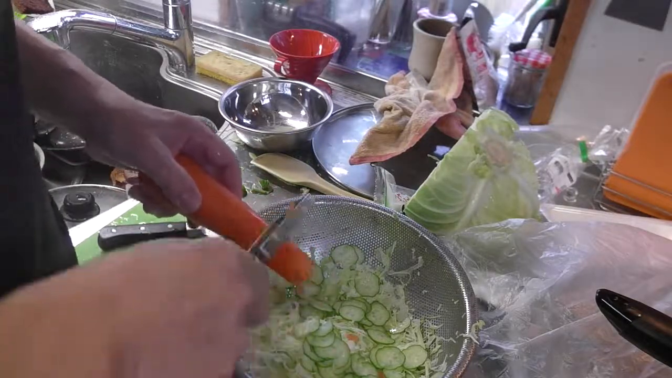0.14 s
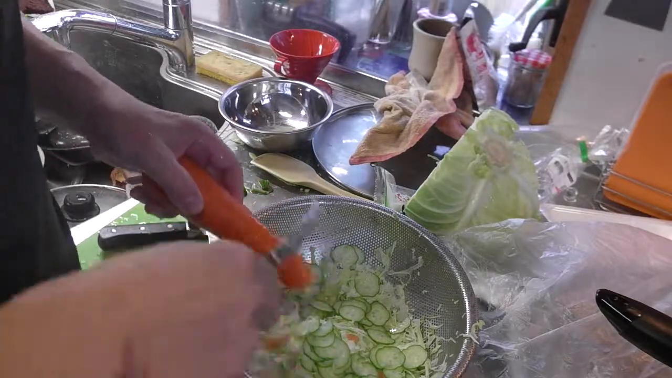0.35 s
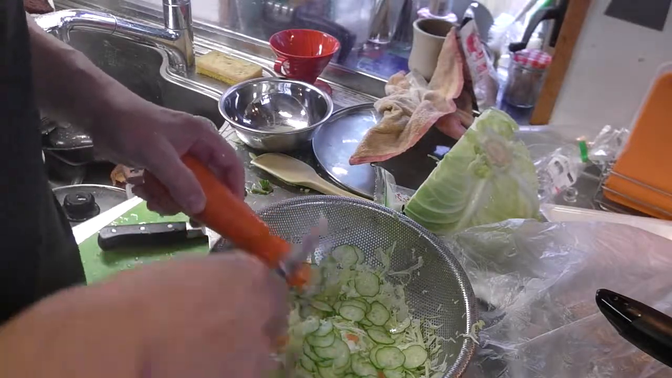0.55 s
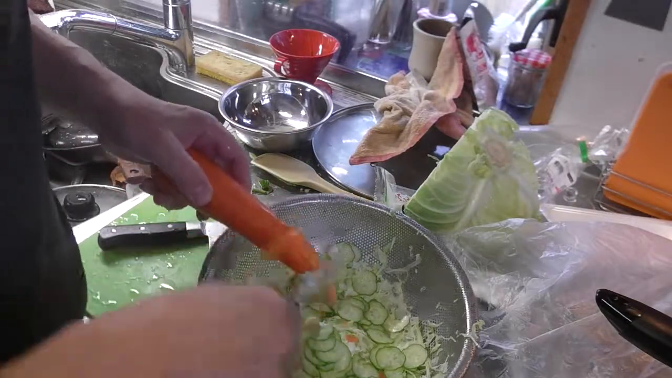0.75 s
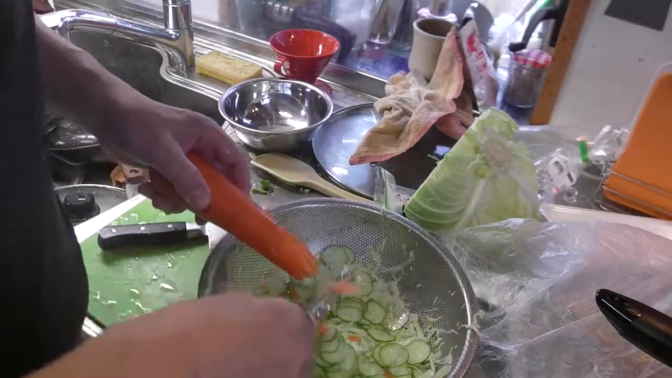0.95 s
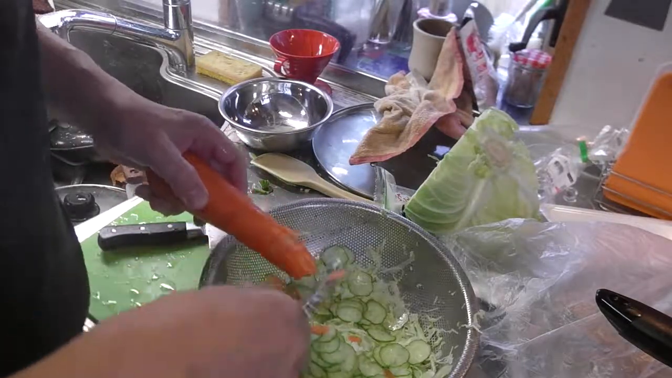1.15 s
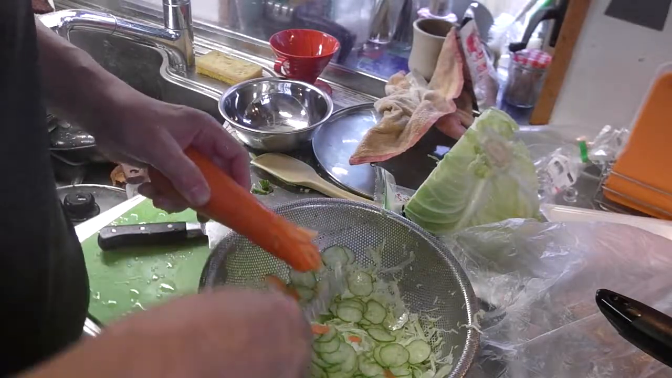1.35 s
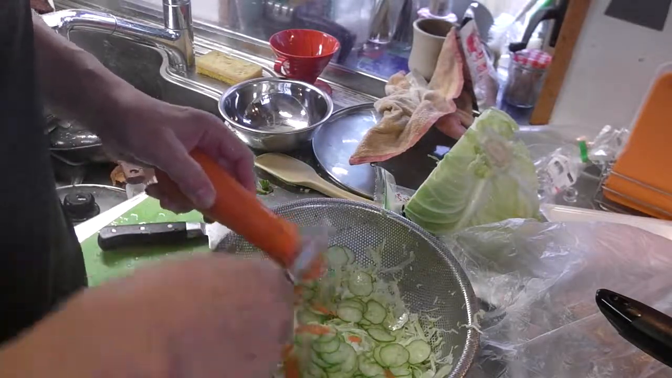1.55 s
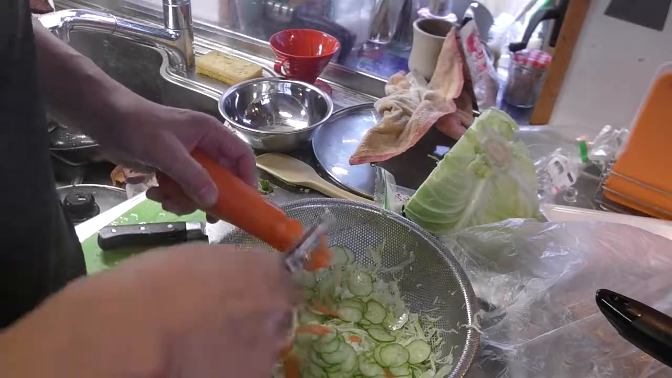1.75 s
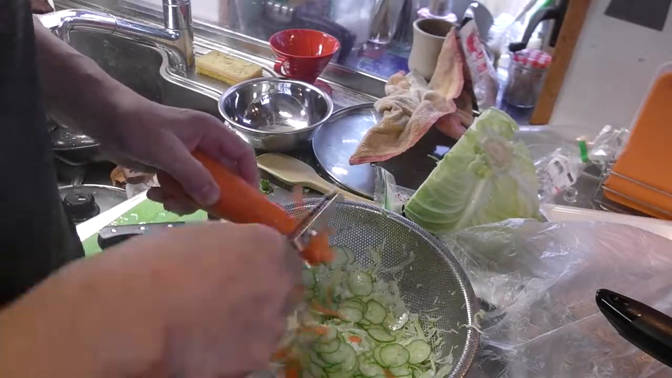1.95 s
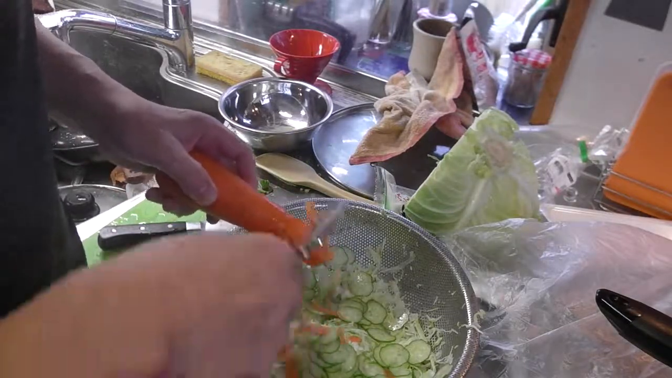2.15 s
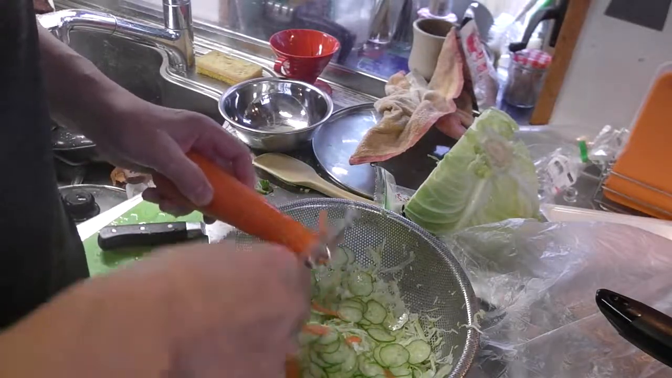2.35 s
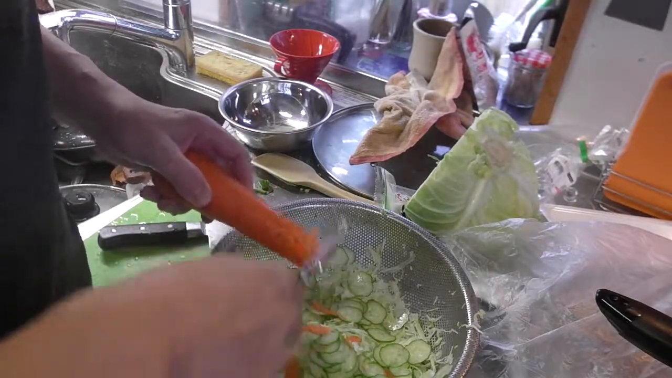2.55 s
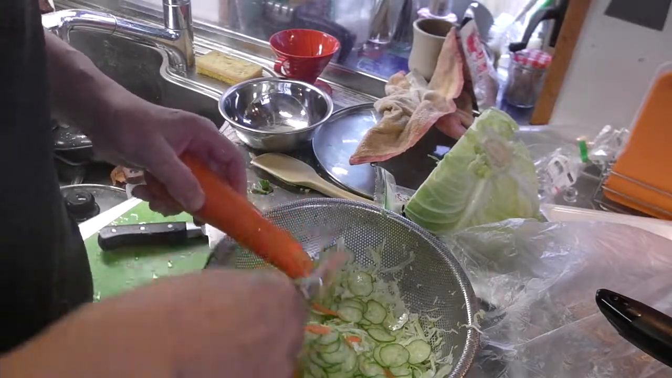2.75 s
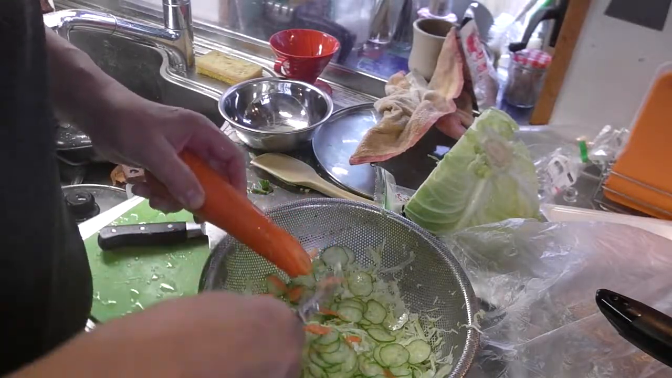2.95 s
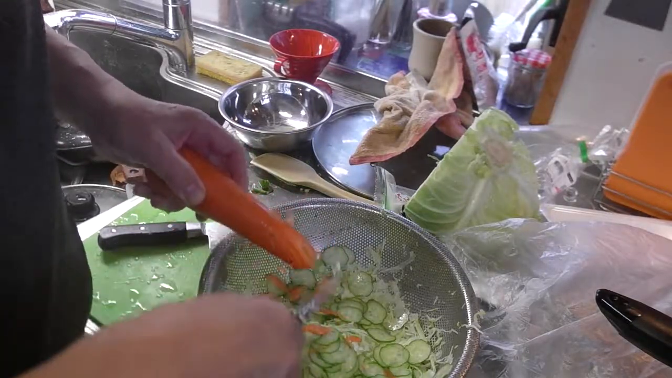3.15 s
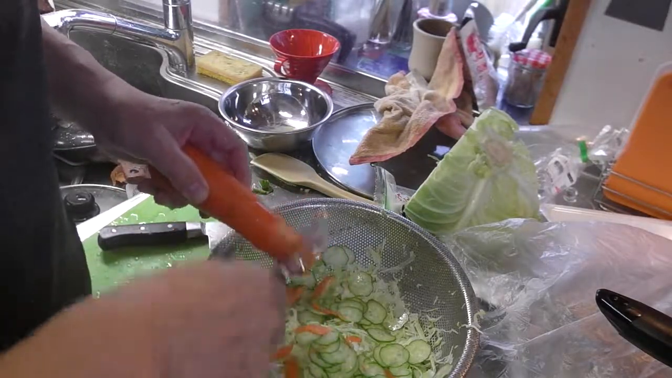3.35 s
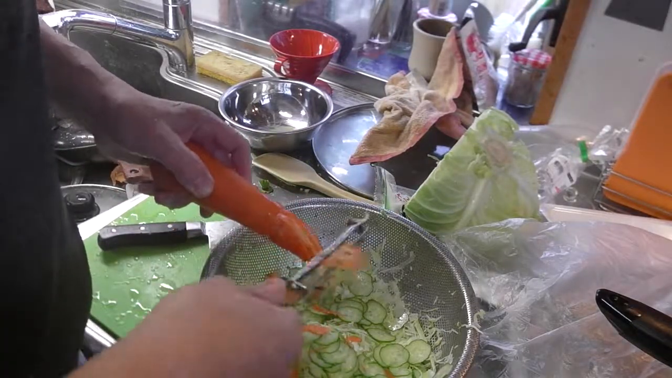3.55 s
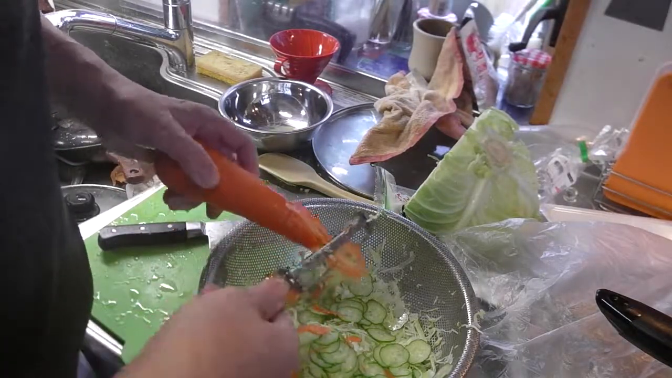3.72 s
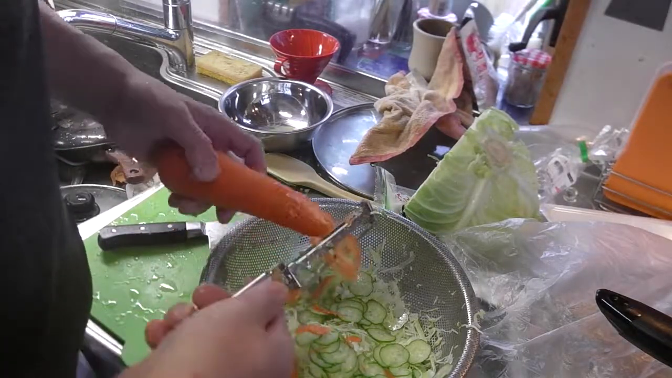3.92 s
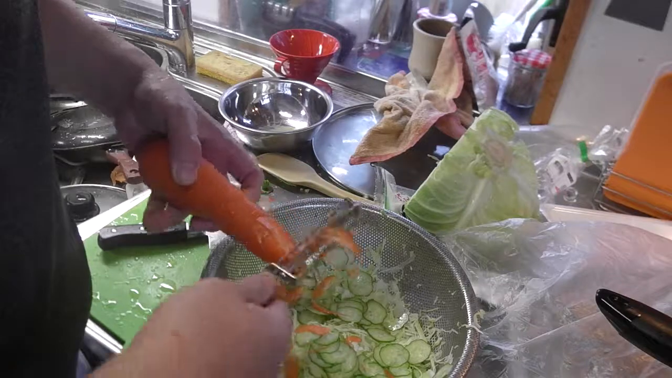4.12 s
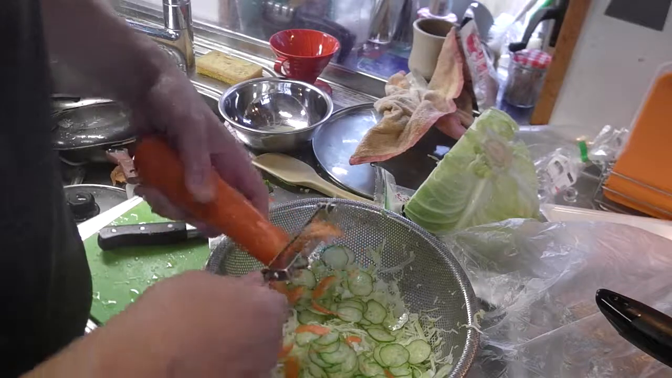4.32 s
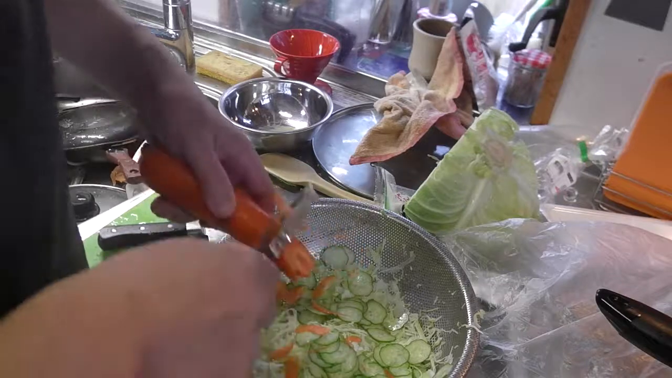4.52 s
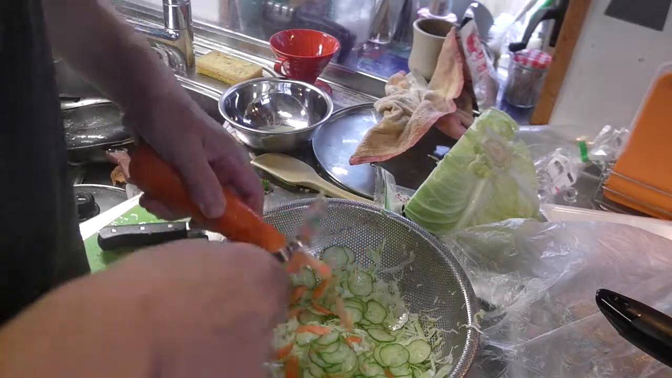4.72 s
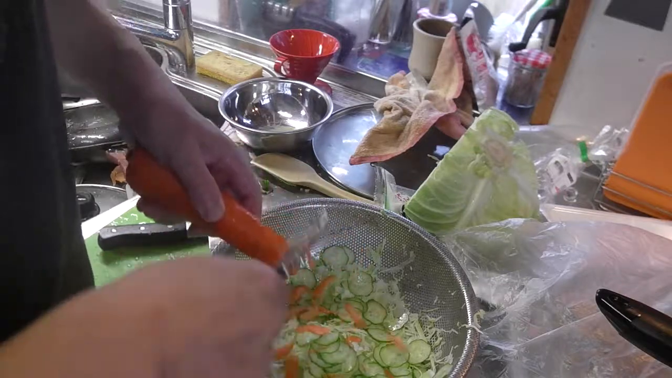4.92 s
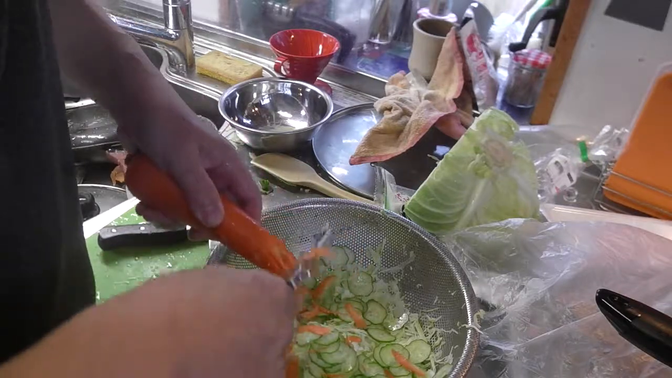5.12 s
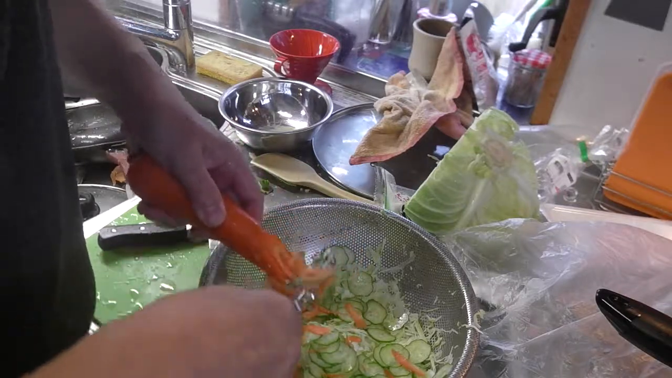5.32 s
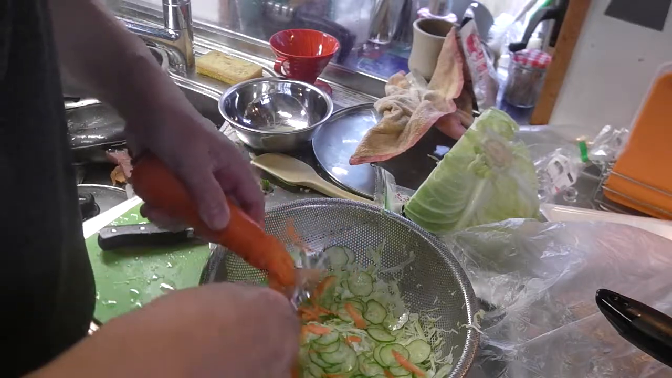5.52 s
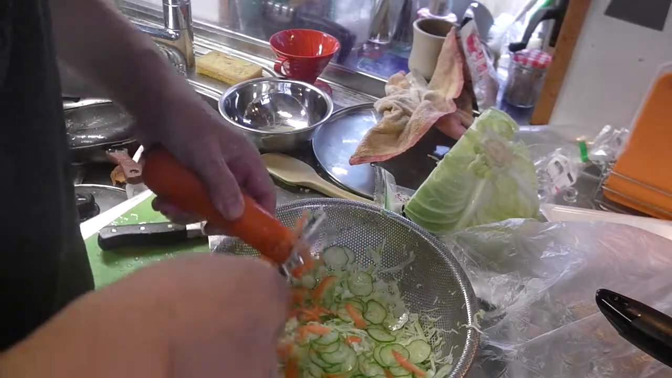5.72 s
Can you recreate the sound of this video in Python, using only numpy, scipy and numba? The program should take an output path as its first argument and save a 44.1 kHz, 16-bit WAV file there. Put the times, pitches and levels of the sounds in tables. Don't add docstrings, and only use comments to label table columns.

```python
import sys
import numpy as np
from scipy import signal
from scipy.fft import rfft, irfft, next_fast_len
from scipy.io import wavfile
from scipy.ndimage import uniform_filter1d, minimum_filter1d
from numba import njit

SR = 44100
rng = np.random.default_rng(int(sys.argv[2]) if len(sys.argv) > 2 else 0)


def wav_out(sig):
    wavfile.write(sys.argv[1], SR, np.round(np.clip(np.atleast_2d(sig).T, -1, 1) * 32767).astype(np.int16))


def linear_from_db(decibels):
    return 10 ** (np.asarray(decibels, float) / 20)


N = 258867
KNEE_DB, RATIO = -8.5, 1.447


def shape(table, hz):
    f, db = np.transpose(table)
    return np.interp(np.log(hz + 1), np.log(f), db)


def colour(x, gain):
    return irfft(rfft(x) * gain, x.shape[-1])


def walk(rate):
    hold = int(SR / rate)
    steps = np.repeat(rng.standard_normal(N // hold + 1), hold)
    return 1.3 * uniform_filter1d(uniform_filter1d(steps, hold), hold)[:N]


# frequency in Hz, side minus mid in dB.
STEREO_WIDTH = [(60, -11), (110, -32.5), (200, -22), (380, -26.5), (700, -13.5), (1290, -20), (2380, -31),
                (4400, -13), (8120, -7.5), (15000, -5)]


def pair(mid, side, hz):
    side = colour(side, linear_from_db(shape(STEREO_WIDTH, hz)))
    return np.array([mid + side, mid - side])


# frequency in Hz, density in dB per Hz.
AIR_COLOUR = [(20, -44), (38, -21), (50, -14.5), (76, -17.5), (149, -5), (285, -7.5), (439, -14),
              (531, -25.5), (818, -21.5), (1190, -20), (2350, -28.5), (4500, -34), (9000, -48),
              (16000, -55.5)]
# frequency in Hz, width in Hz, gain in dB.
DUCT_MODES = [(81.2, 14.8, 17), (150.7, 11.5, 10), (448.3, 54, 10), (1188, 33, 8), (1564, 23, 9),
              (2308, 14, 16), (310.4, 85, -11), (587, 4.2, 16), (1073, 85, -20)]
# time in seconds, level in dB.
DRAUGHT_PUFFS = [(.29, 4.5), (.52, 0), (.86, -9), (1.11, 5), (1.39, -3), (1.65, 5.5), (1.9, 6), (2.52, 1.5),
                 (2.78, 11), (3.6, 1), (3.95, -1), (4.53, 4.5), (4.94, -7), (5.02, 7), (5.36, 5),
                 (5.61, 4.5), (5.74, 6.5)]


def extractor():
    level_db, puff_s = -30, 0.039
    size = next_fast_len(N)
    t, hz = np.arange(N) / SR, np.fft.rfftfreq(size, 1 / SR)
    puffs = sum(db * np.exp(-((t - s) / puff_s) ** 2) for s, db in DRAUGHT_PUFFS)
    drone = puffs + 1.7 * walk(14)
    rumble = 0.4 * drone + 1.0 * walk(9)
    duct_db = sum(gain / (1 + (2 * (hz - f) / width) ** 2) for f, width, gain in DUCT_MODES)
    gain = linear_from_db(shape(AIR_COLOUR, hz) + duct_db)
    air = pair(*colour(rng.standard_normal((2, size)), gain), hz)
    out = 0
    for centre in 40 * 2 ** np.arange(10):
        band = np.cos(np.clip(np.log2((hz + 1) / centre), -1, 1) * np.pi / 2) ** 2
        if centre < 100:
            gust_db = rumble
        elif centre < 200:
            gust_db = drone
        else:
            gust_db = 0.37 * drone if centre < 700 else 0
        flutter_db = 0.37 * walk(5.96) + 0.55 * walk(1.3)
        out = out + colour(air, band)[:, :N] * linear_from_db(1.3 * gust_db + flutter_db)
    return out * linear_from_db(level_db) / np.sqrt(np.mean(out ** 2))


# start in seconds, peak in dB, pitch in Hz, 60 dB decay in seconds.
WORKTOP_KNOCKS = [
    (0.645, -19, 79, 0.12),
    (0.739, -22.5, 84.7, 0.17),
    (4.636, -29.5, 75.5, .08),
]


def thumps():
    t, out = np.arange(N) / SR, 0
    for s, db, hz, t60 in WORKTOP_KNOCKS:
        u = np.maximum(t - s, 0)
        swell = (1 - np.exp(-u / 0.0031)) ** 2
        decay = np.exp(-np.log(1000) * u / t60)
        out = out + 3 * linear_from_db(db) * swell * decay * np.sin(2 * np.pi * hz * u)
    return out


# start in seconds, end in seconds, level in dB.
STRIP_SLIDES = [
    (0.667, 0.777, -33.5),
    (0.884, 0.962, -35),
]
# frequency in Hz, width in Hz, level in dB.
SIEVE_WIRES = [(3340, 60, 6), (3960, 86, 13), (4960, 80, 3), (5530, 70, 9)]


def rustle():
    t, hz = np.arange(N) / SR, np.fft.rfftfreq(N, 1 / SR)
    sliding = sum(linear_from_db(db) * np.sin(np.pi * np.clip((t - a) / (b - a), 0, 1)) ** .5
                  for a, b, db in STRIP_SLIDES)
    crackle = linear_from_db(3.06 * rng.exponential(size=N) + 2.4 * walk(300))
    grains = sliding * crackle * rng.standard_normal((2, N))
    wires = 1 + sum(linear_from_db(db) / (1 + 2j * (hz - f) / width) for f, width, db in SIEVE_WIRES)
    dull = 1 / (1 + ((hz - 4600.) / 3200.0) ** 4)
    return pair(*colour(grains, 0.66 * wires * dull), hz)


def chatter(t, rise_ms, rasp_db, rasp_s):
    size = len(t)
    rise = np.clip(rise_ms, .1, 6) / 1000
    clack = np.exp(np.where(t < 0, t / rise, -t / (0.0043 + 0.82 * rise)))
    rasp_end = 1 + np.exp(np.clip((t - rasp_s) / 0.02, -50, 50))
    rasp = linear_from_db(rasp_db) * np.exp(np.minimum(t, 0) / rise) / rasp_end
    patchy = uniform_filter1d(np.repeat(rng.standard_normal(size // 64), 64), 64)
    grains = linear_from_db(5.9 * np.minimum(rng.exponential(size=size), 3.1))
    envelope = clack * linear_from_db(1.34 * patchy) + rasp * linear_from_db(3.4 * patchy)
    return envelope * grains * rng.standard_normal((2, size))


# frequency in Hz, width in Hz, level in dB.
STEEL_MODES = [(2350, 60, -12), (2847, 54, -13.5), (3160, 120, -24), (3570, 20, -11), (3984, 67, -1),
               (4230, 90, -8.5), (4830, 27, -18), (6060, 71, -22), (6394, 310, -12), (7200, 89, -17.5),
               (8700, 206, -7.5), (9476, 154, -5.5), (11570, 150, -4.5), (12600, 180, -12),
               (13700, 72, -14.5), (15700, 150, -52.5)]
# frequency in Hz, density in dB per Hz.
CRACK_COLOUR = [(400, -48), (700, -60), (1160, -26), (1800, -28), (2400, -12), (3100, -25.5), (3700, -11),
                (4700, -9), (8000, -13), (11900, -13), (15500, -16), (16400, -15.5)]


def steel_body(hz, low_db, ring_db):
    frame_hz = 3970
    grip = np.interp(hz, np.linspace(0, SR / 2, 40), rng.standard_normal(40))
    body = linear_from_db(shape(CRACK_COLOUR, hz) - 3.0 + 0.89 * grip) + 0j
    for f, width, db in STEEL_MODES:
        scatter, drift = rng.standard_normal(2)
        centre = f * (1 + .008 * drift)
        strength_db = db - 1.5 + 3 * np.clip(scatter, -2, 1.5)
        if abs(f - frame_hz) < 200:
            strength_db += ring_db
        body = body + linear_from_db(strength_db) / (1 + 2j * (hz - centre) / (1.26 * width))
    return body * linear_from_db(low_db / (1 + (hz / 3370.0) ** 12))


def contact(rise_ms, rasp_db, rasp_s, low_db, ring_db=0, size=8192, lead=1024):
    t, hz = (np.arange(size) - lead) / SR, np.fft.rfftfreq(size, 1 / SR)
    force = chatter(t, rise_ms, rasp_db, rasp_s)
    out = pair(*colour(force, steel_body(hz, low_db, ring_db)), hz) * np.hanning(size) ** 0.026
    return out / np.sqrt(np.mean(out[:, lead:lead + size // 32] ** 2))


# time in seconds, peak in dB, swell in ms, rasp in dB under the peak,
# carrot and handle share under 3.4 kHz in dB.
BLADE_LANDINGS = [(.0888, -9, 1.7, -18, -3), (.322, -16.5, .9, -6, -11), (.5302, -12.5, 1.7, -11, 2),
                  (.7623, -12, 4.8, -2, 2.5), (.9963, -9, 2.1, -6, -0.5), (1.221, -13, 1.8, 7, 4),
                  (1.449, -13, .8, -9, 3), (1.664, -14.5, .4, -15, -8), (1.886, -13, .44, -5.5, 4),
                  (2.1087, -8.5, 0.3, -16, -2), (2.3204, -7.5, 1.5, -9, -4), (2.5416, -8, .32, -16.5, -10),
                  (2.7673, -9.5, 2.7, -9, -2), (3.0, -13, 2.8, -5.5, -1), (3.245, -17.5, 0.45, -16, 6),
                  (4.4475, -15, .5, -6, 2.5), (4.6774, -15, .98, -18, 2), (4.908, -19, .49, -7, -14),
                  (5.15, -15.5, 2.8, -15, -9), (5.3793, -12.5, 2, -19, 3), (5.636, -17.5, 0.9, -18, 1)]
# time in seconds, peak in dB, swell in ms, rasp in dB under the peak,
# carrot and handle share in dB.
TOOTH_BITES = [(.1308, 4, 0.91, -33, -2.5), (.3574, 0, 0.57, -23.5, 0), (.5677, -2, 0.93, -19.5, 2),
               (.7933, 0.5, 0.4, -27.5, -3), (1.022, -4, 1, -28, -3.5), (1.2504, 0.5, 0.87, -24, -3.5),
               (1.4835, -3, 1.8, -29, -5.5), (1.7077, 5.5, 1.6, -28.5, -4), (1.9325, 1.5, 0.49, -25, -2),
               (2.1492, 0, 0.56, -28, -1), (2.3684, 5.5, 0.16, -35, -4.5), (2.5882, 1, 0.48, -23.5, -5),
               (2.806, .5, .31, -18, -2.5), (3.04, -1.5, .47, -20, 1), (3.288, 5.5, 1.1, -32, -3.5),
               (4.4645, -2.5, 2.8, -14.5, -2), (4.7138, 3, 0.57, -33, -4), (4.938, -4, 1.7, -15.5, 2.5),
               (5.1669, -1, 1.5, -22.5, -2), (5.396, 0.5, 1.1, -24.5, -4.5), (5.655, -0.5, 0.55, -21.5, 1)]
# time in seconds, peak in dB, swell in ms,
# rasp in dB under the peak, carrot and handle share in dB.
BLADE_RETURNS = [(.2178, -6, 2, -41, -9), (.4376, -7.5, 2.5, -26, -5), (.635, -5.5, 0.95, -16.5, -.5),
                 (.8832, -10, 0.95, -15, -11), (1.1113, -6.5, 4.7, -21, -4), (1.3142, -5, 0.82, -25, -6),
                 (1.5552, -9.5, 3.2, -19, 2.5), (1.7666, -6, 1.6, -35, 1), (1.9844, -8, 0.95, -19, -15),
                 (2.1925, -8, 5.1, -22, -18), (2.4193, -5, 2.7, -36, -7), (2.6543, -6.5, 1.9, -21, -3),
                 (2.8696, -4, 2.1, -27, -8), (3.1006, -7, 1.0, -17, -1), (3.3555, -6, 1.6, -27, -8),
                 (4.5532, -1.5, 0.64, -25, -8), (4.7778, -5, 0.37, -25, -4), (5.0477, -7, 0.55, -21, -5),
                 (5.248, -6.5, 1.3, -37, -6), (5.501, -7.5, 5.7, -18, -2), (5.7505, -4, 1.8, -25, -5)]
# time in seconds, peak in dB.
PIVOT_BOUNCES = [(0.2147, -18), (.8762, -8.5), (1.4825, -17), (1.974, -12), (2.661, -10.5), (2.88, -9.5),
                 (3.1123, -14), (3.3536, -11.5), (3.362, -8.5), (4.7913, -14), (5.0384, -14), (5.236, -13),
                 (5.252, -5)]
# time in seconds, # peak in dB, rasp in dB under the peak, frame ring in
# dB.
HAND_TOUCHES = [(-.03, -6.5, -16.5, 11.5), (.3019, -29, -2, 0), (0.316, -19, -15, 4), (1.2036, -34, -8, 3),
                (3.22, -34, -14, -1), (3.777, -42, -33, -9), (4.015, -10.5, -4.5, 15.5),
                (4.241, -33, -12, 3), (4.251, -18, -20, -3), (4.3257, -10.5, -5.5, 10.5),
                (4.62, -28, -37, -3), (5.597, -27, -20, 13), (5.867, -29.5, -16, 4)]


def peeler():
    rows = []
    for table, rasp_s in ((BLADE_LANDINGS, 0.055), (TOOTH_BITES, 0.055), (BLADE_RETURNS, 0.023)):
        rows += [(s, db, swell_ms, rasp_db, rasp_s, low_db) for s, db, swell_ms, rasp_db, low_db in table]
    rows += [(s, db, 1, -25, 0.026, -4.5) for s, db in PIVOT_BOUNCES]
    rows += [(s, db, .65, rasp_db, 0.025, -2.1, ring_db) for s, db, rasp_db, ring_db in HAND_TOUCHES]
    out = np.zeros((2, N + SR))
    for s, db, *touch in rows:
        blow_db = db - 9.0 + (RATIO - 1) * max(db - KNEE_DB, 0)
        i = int(s * SR) + SR // 2 - 1024 - 12
        out[:, i:i + 8192] += contact(*touch) * linear_from_db(blow_db)
    return out[:, SR // 2:SR // 2 + N]


def kitchen(x, t60=0.26, treble_t60=0.085, wet_db=-10.0, dull_hz=7130.0, wide_db=5.5):
    t, hz = np.arange(SR // 2) / SR, np.fft.rfftfreq(SR // 2, 1 / SR)
    noise = rng.standard_normal((2, len(t))) * (1 - np.exp(-t / 0.0008))
    low = 1 / (1 + (hz / dull_hz) ** 2)
    body = colour(noise * np.exp(-np.log(1000) * t / t60), low)
    treble = colour(noise * np.exp(-np.log(1000) * t / treble_t60), 0.66 * (1 - low))
    mid, side = body + treble
    tail = pair(mid, side * linear_from_db(wide_db), hz)
    tail *= linear_from_db(wet_db) / np.sqrt(np.sum(tail ** 2, axis=1, keepdims=True))
    return x + signal.fftconvolve(x.mean(axis=0, keepdims=True), tail, axes=1)[:, :N]


def scene():
    return kitchen(peeler() + rustle()) + extractor() + thumps()


@njit
def release(db, step):
    out, e = np.empty(len(db)), 0.
    for i in range(len(db)):
        e = max(db[i], e - step * e)
        out[i] = e
    return out


def late_lows(x):
    split_hz, late_s, spread_s = 4028, .022, 0.00204
    hz = np.fft.rfftfreq(N, 1 / SR)
    low = 1 / (1 + (hz / split_hz) ** 18)
    delay_s = late_s + spread_s * (1 - hz / (2 * split_hz))
    return colour(x, 1 - low + low * np.exp(-2j * np.pi * hz * delay_s))


def duck_ahead(x):
    ahead_s, release_s = 0.0207, 0.036
    over_db = np.maximum(20 * np.log10(np.abs(x).max(axis=0) + 1e-9) - KNEE_DB, 0)
    ahead = int(ahead_s * SR)
    over_db = -minimum_filter1d(-over_db, ahead, origin=-(ahead // 2))
    over_db = uniform_filter1d(release(over_db, 1 / (release_s * SR)), 64)
    return x * linear_from_db(-over_db * (1 - 1 / RATIO))


def low_pass(x):
    return signal.sosfilt(signal.butter(12, 16480, fs=SR, output="sos"), x)


def record(dry):
    x = duck_ahead(late_lows(dry))
    x = x + 0.053 * colour(x ** 2, np.fft.rfftfreq(N, 1 / SR) > 300)
    top_cut = signal.ellip(10, .2, 60, 15750, fs=SR, output="sos")
    x = signal.sosfilt(top_cut, x)
    return low_pass(np.clip(x, -1, 1))


dry = scene()
out = record(dry)
wav_out(out)
```